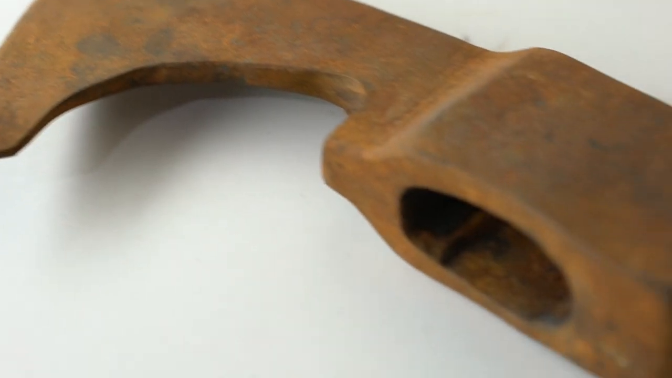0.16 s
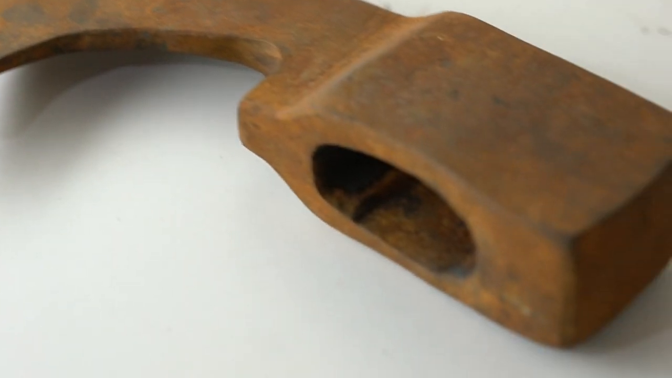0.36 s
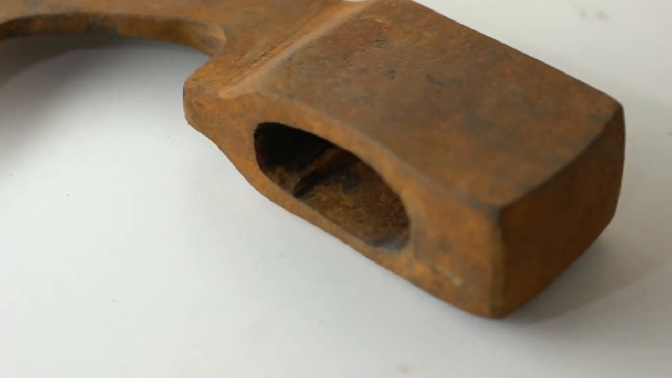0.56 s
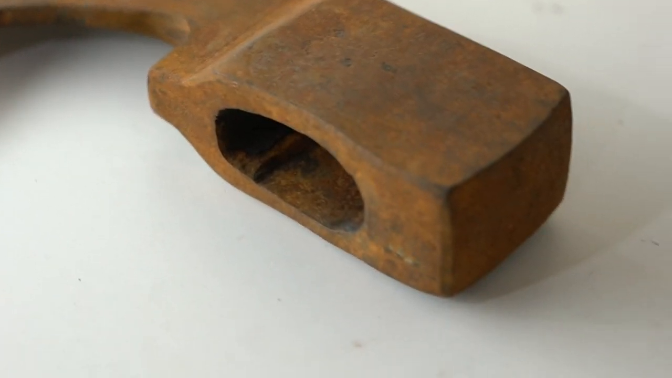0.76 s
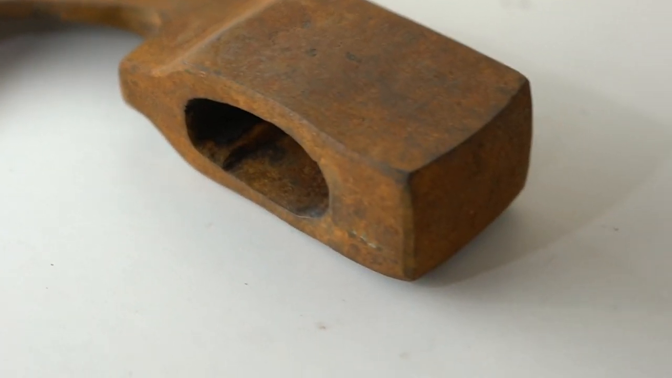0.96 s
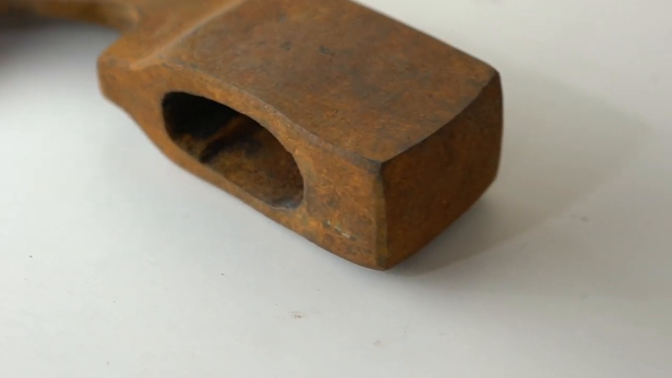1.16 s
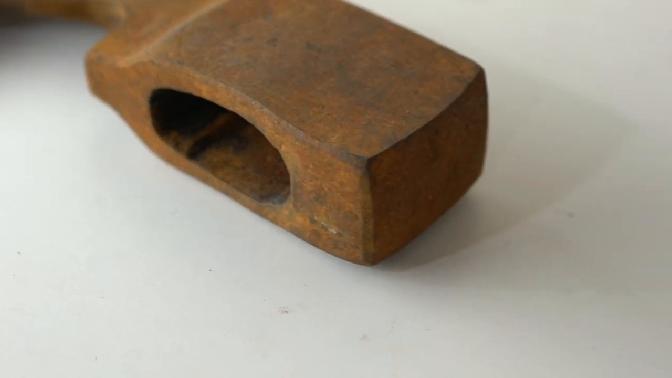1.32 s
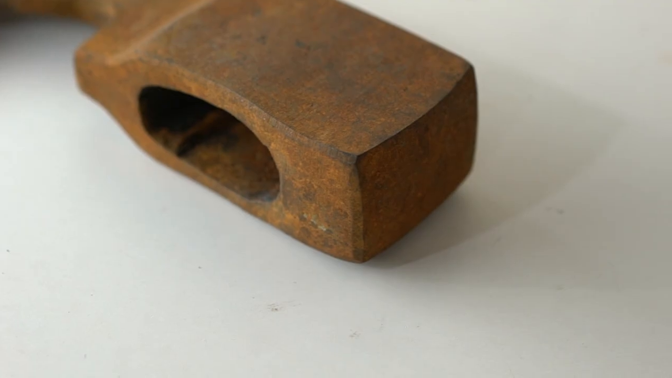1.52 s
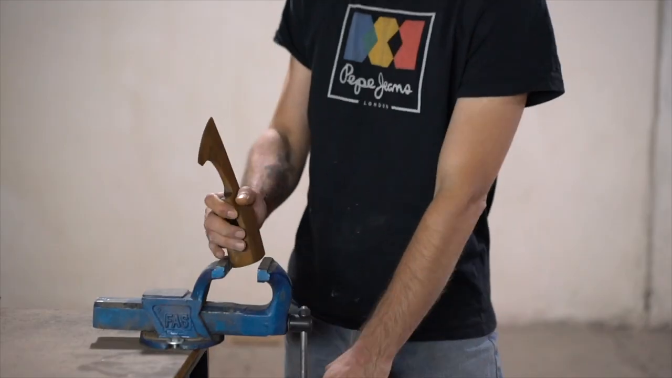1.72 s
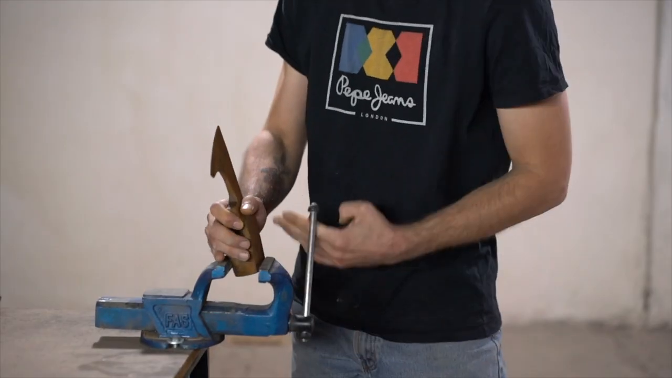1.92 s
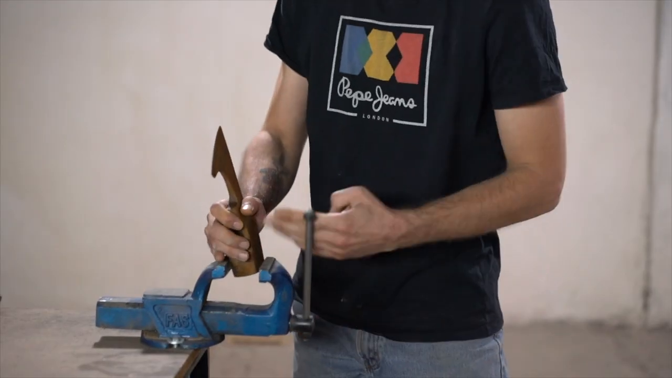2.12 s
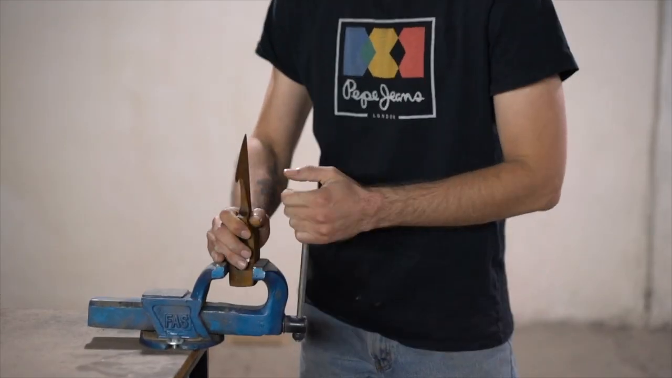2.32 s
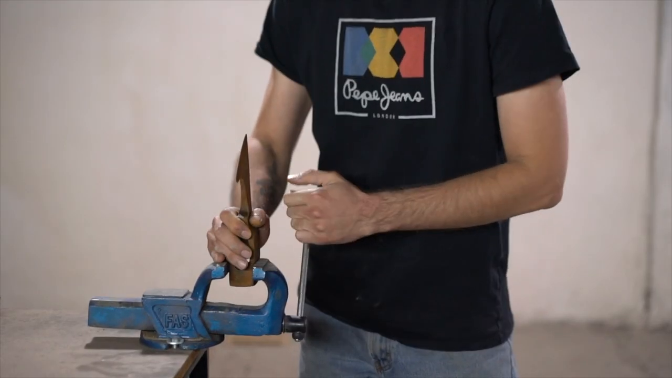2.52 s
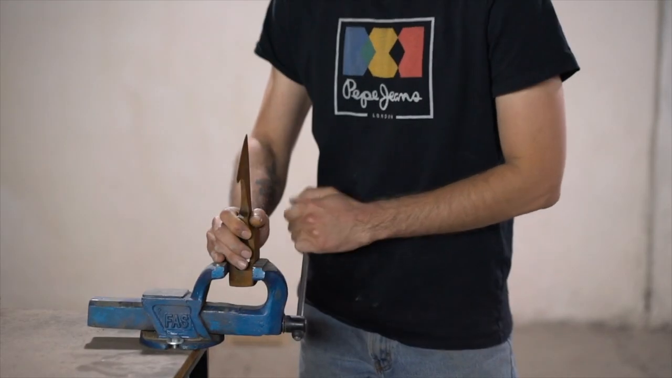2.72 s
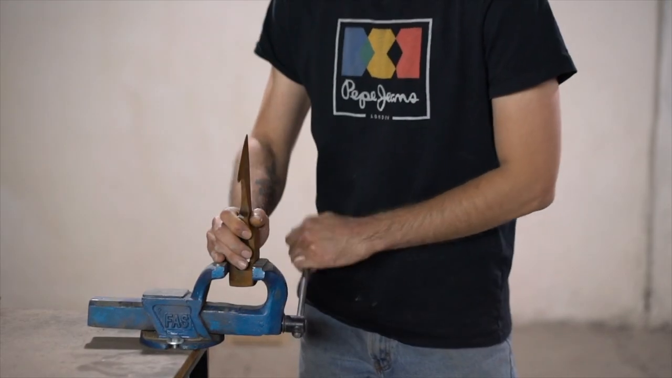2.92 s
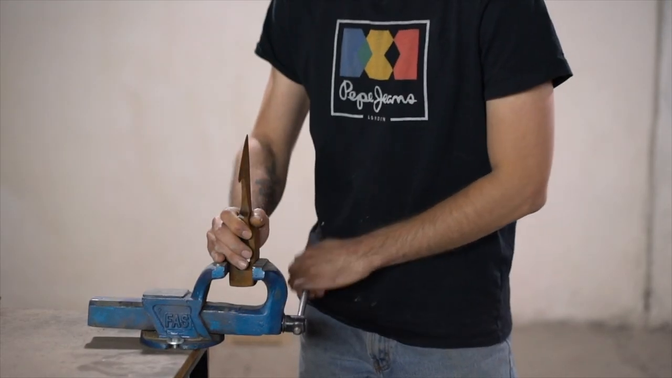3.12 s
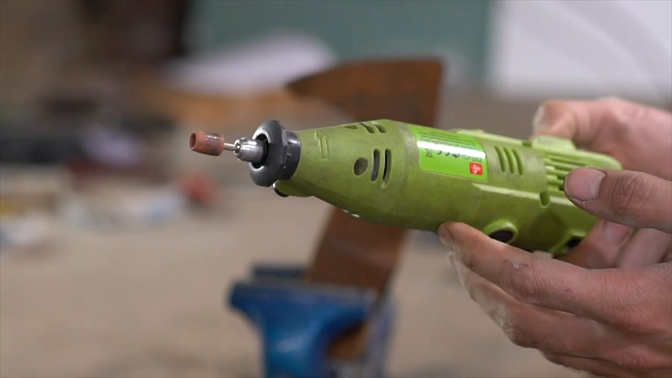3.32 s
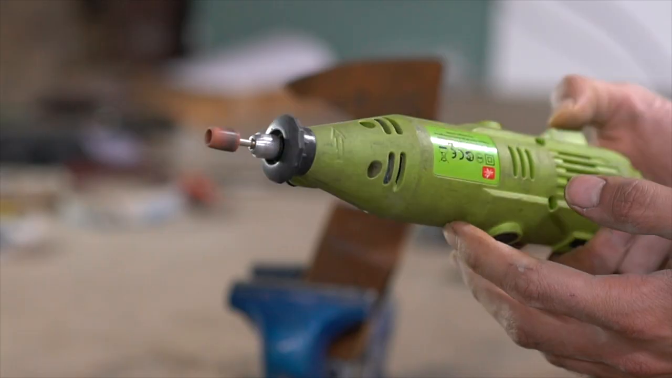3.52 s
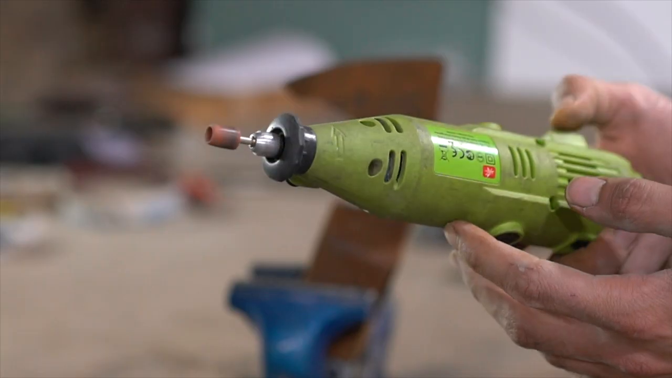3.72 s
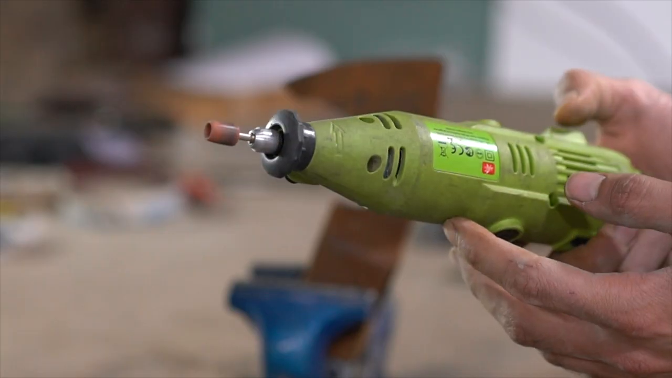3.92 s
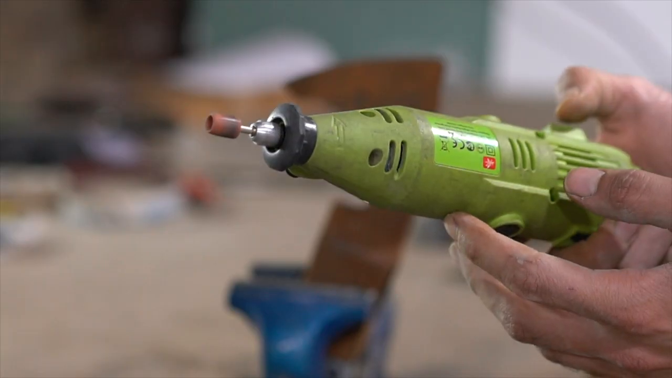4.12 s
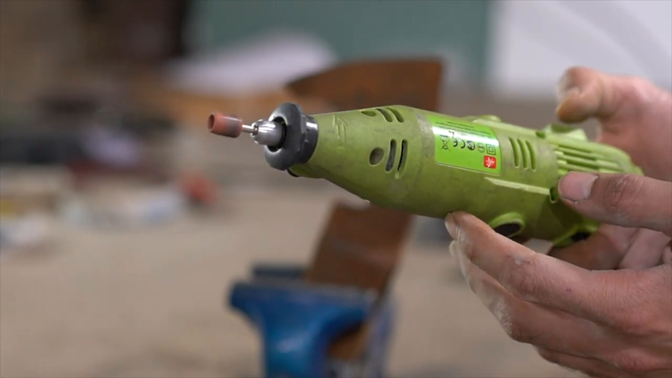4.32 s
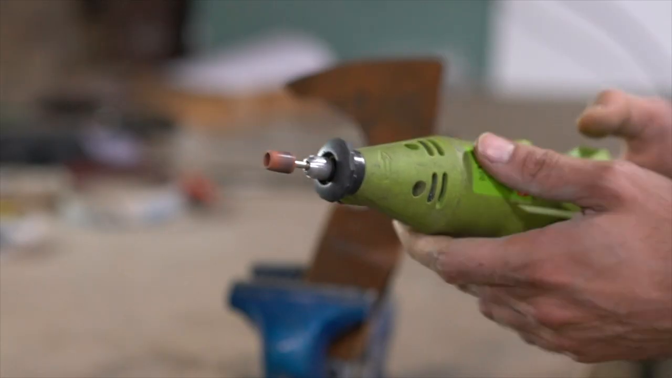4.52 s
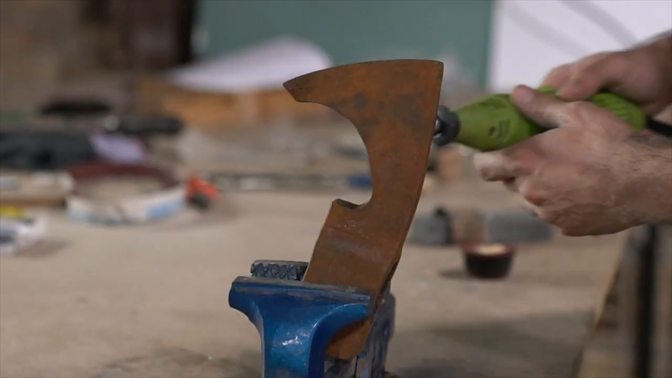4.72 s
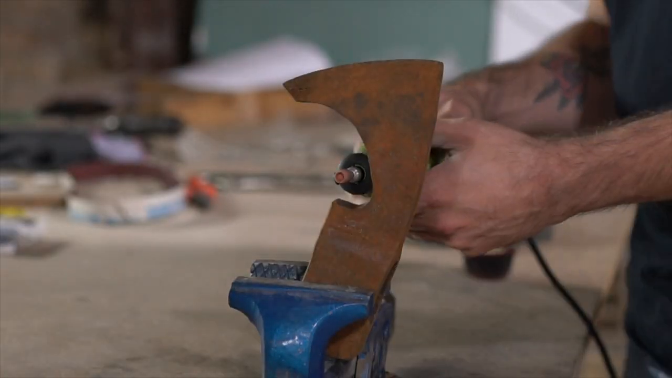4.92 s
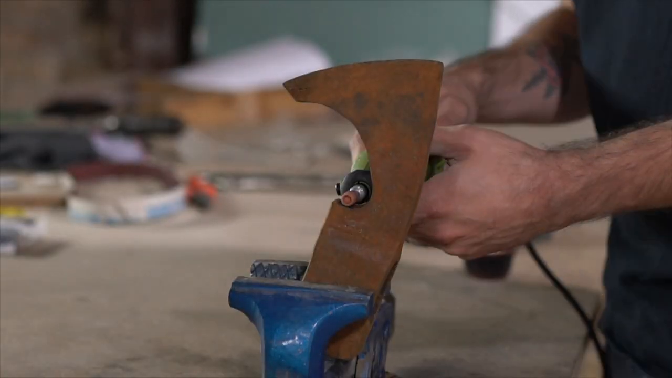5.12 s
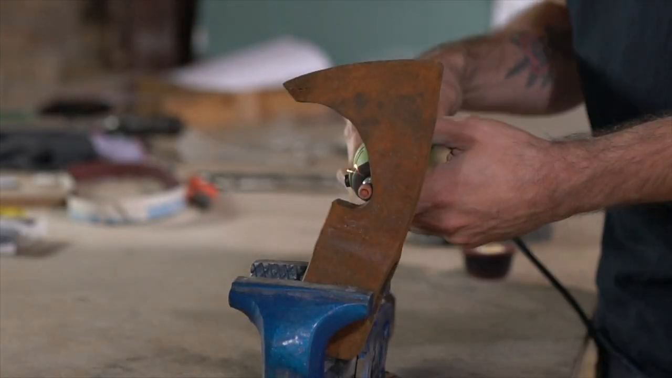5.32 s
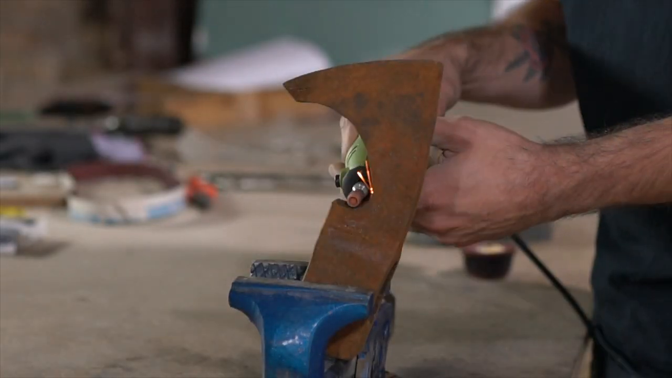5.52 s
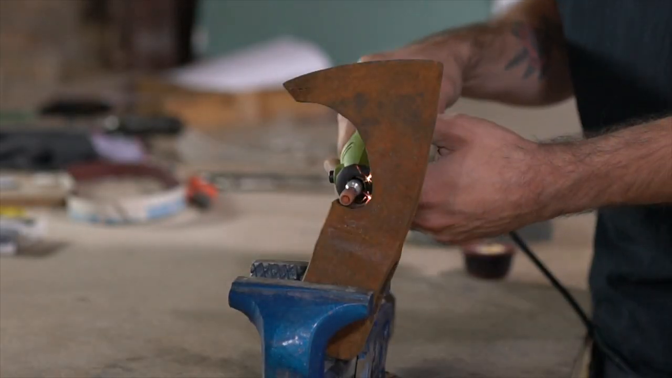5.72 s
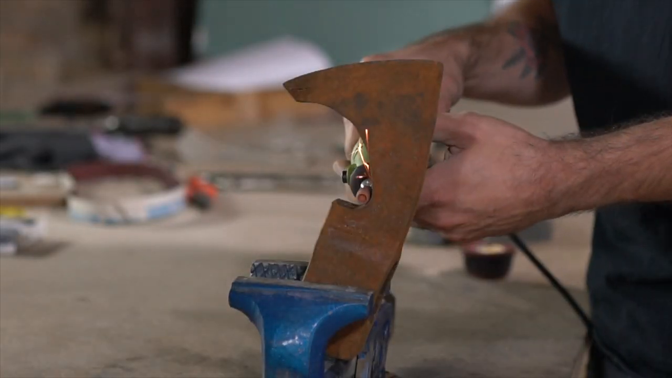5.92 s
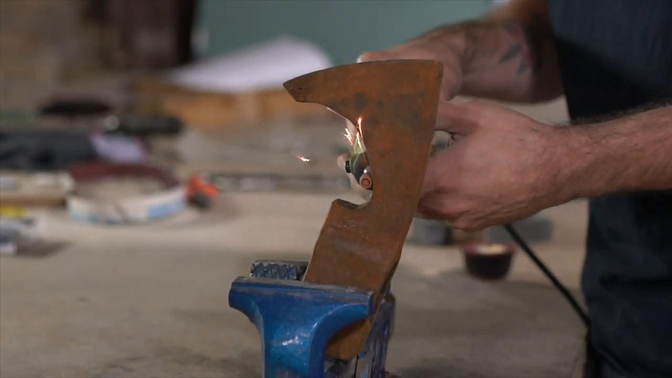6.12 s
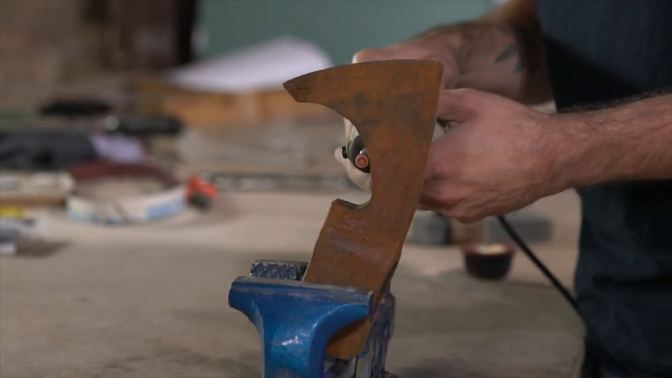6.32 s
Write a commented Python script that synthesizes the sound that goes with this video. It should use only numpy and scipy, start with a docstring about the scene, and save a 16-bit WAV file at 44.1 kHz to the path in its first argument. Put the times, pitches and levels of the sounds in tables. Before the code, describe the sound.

From 0 to 1.6 s there is only quiet, lumpy low rumble, distant traffic-like noise, faint hiss and slightly wavering low hums. At about 1.65 s a wash of noise bursts in and fades; at 1.75 s a hard metal clank strikes the vise, with a weaker knock just after and another at 2.1 s. A bright metallic handle ping sounds at 2.43 s, then a dull knock at 2.7 s, all echoing in the room, left-leaning. The background falls away near 3.2 s. At 3.4 s a small rotary tool clicks on close up, growls briefly and sweeps rapidly up into a shrill, buzzing whine with rushing air. It dips momentarily at 4.35 s and recedes at 4.5 s to a thinner steady whine. From 5.1 s the stone touches steel: gritty rasping, chatter and changing singing tones, the pitch sagging under growing pressure until 6.35 s.

```python
"""Distant rumble and hiss come first, shaped noise that lies under the whole scene, with low wavering sines. An
axe head is set into a bench vise in an echoing workshop and the handle is turned: blows excite decaying modes.
Washes of noise start abruptly and fade. A small rotary tool then clicks on and spins up: its whine is a set of
sines locked to the shaft, amid rushing air and shell buzz. Last its stone grinds the steel with noisy grit."""
import sys
import numpy as np
from scipy import signal
from scipy.io import wavfile
from scipy.ndimage import uniform_filter1d

SR = 44100
rng = np.random.default_rng(int(sys.argv[2]) if len(sys.argv) > 2 else 0)


def master(y):
    """Save y as 16-bit WAV."""
    cut = np.clip(np.atleast_2d(y).T, -1, 1)
    pcm = np.round(cut * 32767)  # scale
    wavfile.write(sys.argv[1], SR, pcm.astype(np.int16))


N = 280476
FRAME, HOP = 1024, 256  # short-time spectrum of the noises [samples]
STEP = 16  # spacing of the values that shape the whine [samples]
EDGE_HZ = 16000  # upper band limit
KICK_S, ON_S = 3.379, 3.388  # the shaft starts to climb; the tool becomes audible
TOP_HZ = 547  # top shaft speed [turns/s]

# likeness of left and right channels: (frequency [Hz], share of common signal [0-1])
SAME = [(140, 1.), (300, 0.96), (600, 0.68), (1500, 0.62), (5000, 0.34), (12000, 0.59)]
# the stone on the steel: (time [s], strike level [dB], grit level [dB])
CONTACT = [(5.11, -48.5, -25), (5.21, -39.5, -26), (5.3, -44.5, -30.5), (5.49, -39, -27.5),
           (5.57, -39, -25), (5.8, -39.5, -27), (6.1, -37.5, -27), (6.21, -42.5, -31.5),
           (6.36, -42.5, -38.5)]
# Tool levels in fours: (idle at the work [dB], added when near, by starting strain, by full pressure [dB])


def gain_of(db):
    """Amplitude ratio from a level: 20 dB is a factor of ten."""
    return 10 ** (np.asarray(db) / 20)


def evened(x):
    """Normalisation to unit effective (rms) value."""
    return x / np.sqrt(np.mean(x ** 2) + 1e-20)


def read(points, hz):
    """A spectral curve, interpolated over logarithmic frequency as pitch is."""
    f, value = np.transpose(points)
    return np.interp(np.log(hz + 1), np.log(f + 1), value, left=value[0], right=value[-1])


def columns(rows):
    """Linear interpolation in time: each column of a curve table, one value a sample."""
    s, *rest = np.transpose(rows)
    return [np.interp(np.arange(N) / SR, s, c) for c in rest]


def add(mix, s, sound):
    """Superposition: sound joins the mix in place from time s."""
    part = mix[..., round(s * SR):][..., :sound.shape[-1]]
    part += sound[..., :part.shape[-1]]


def wander(per_s, count=1, size=N, step=1):
    """Slow random modulation of rms near 1: random points joined by lines, a value every step samples."""
    points = rng.standard_normal((count, int(size / SR * per_s) + 2))
    at = np.arange(0, size, step) / SR * per_s
    joined = np.array([np.interp(at, np.arange(len(p)), p) for p in points])
    return joined * np.sqrt(1.5)  # lines between points lose a third of the power


def noise(shape_db, patchy_db, size=N):
    """Coloured stereo noise of rms 1 in the last size samples: a random spectrum weighted by shape_db(hz)."""
    frames, hz = size // HOP + 5, np.fft.rfftfreq(FRAME, 1 / SR)[:, None]
    a, b, c, d, patches = rng.standard_normal((frames, len(hz), 5)).T
    patches = uniform_filter1d(patches, size=12, axis=0)
    patches = evened(uniform_filter1d(patches, size=10, axis=1))
    same = np.clip(read(SAME, hz), 0, 1)
    left = a + 1j * b
    right = same * left + np.sqrt(1 - same ** 2) * (c + 1j * d)
    colour = gain_of(shape_db(hz))  # may vary from frame to frame
    colour = colour / np.linalg.norm(colour, axis=0) * gain_of(patchy_db * patches)
    sound = signal.istft(colour * np.array([left, right]), nperseg=FRAME, noverlap=FRAME - HOP)[1]
    return np.pad(evened(sound[:, :size]), [(0, 0), (N - size, 0)])


def steep(points):
    """Band limitation: a spectrum curve that drops by 60 dB outside its ends."""
    return lambda hz: read(points, hz) - 60 * ((hz < points[0][0]) | (hz > points[-1][0]))


def by_frame(curve, size):
    """Sampling of a curve at the frame rate, over its last size samples."""
    return np.pad(curve[-size::HOP], (0, 5), "edge")[:size // HOP + 5]


def room(x):
    """Reverberation: sparse reflections of random sign, each band decaying at its own rate."""
    # reverberation of the shop: (frequency [Hz], time to fall 60 dB [s])
    shop_decay = [(200, 4.14), (530, 0.75), (1400, 0.92), (3700, 0.28), (9700, 0.69)]
    taps = np.zeros((2, 2 * SR))
    at = np.arange(400, 2 * SR - 20, 20) + rng.integers(0, 20, (2, (2 * SR - 401) // 20))
    np.put_along_axis(taps, at, rng.choice([-1., 1.], at.shape), 1)
    hz, t, z = signal.stft(taps, SR, nperseg=512)
    same = np.clip(read(SAME, hz), 0, 1)[:, None]
    z[1] = same * z[0] + np.sqrt(1 - same ** 2) * z[1]
    fade = gain_of(-60 * t / read(shop_decay, hz)[:, None])
    tail = signal.istft(z * fade, SR, nperseg=512)[1]
    return signal.fftconvolve(x[None], tail / np.linalg.norm(tail[0]), axes=1)[:, :N]


def ring(modes):
    """Free vibration after a blow: exponentially decaying sines, scaled to peak 1."""
    t = np.arange(SR // 2) / SR
    # loose parts make each tone flutter, growing to full depth over the first 12 ms
    flutter_db = 6.5 * wander(240, count=len(modes), size=len(t)) * np.minimum(t / .012, 1)
    x = np.zeros(len(t))
    for flutter, (hz, db, t60) in zip(gain_of(flutter_db), modes):
        x += flutter * gain_of(db - 60 * t / t60) * np.sin(2 * np.pi * hz * t)
    return x / abs(x).max()


def outside():
    """Broadband background: lumpy low rumble, far traffic and hiss, with a shared swell of level."""
    # swell of all outside noise: (time [s], swell [dB])
    swell_curve = [(0, 1.5), (.95, 1.5), (1.5, 2), (1.9, 7.5), (2.6, 1.5), (3.17, -3), (3.25, -5.5),
                   (6.36, -7.5)]
    # spectra of the three noises: (frequency [Hz], relative density [dB])
    rumble_shape = [(26, -20), (36, 0.5), (55, -3), (78, 12), (98, -13), (122, 4), (160, -41.5),
                    (200, -10.5), (300, -23.5)]
    traffic_shape = [(150, -6), (320, 3), (1100, -4.5), (2000, -10), (5000, -29)]
    hiss_shape = [(1500, -12), (5000, -3.5), (16300, -10)]
    # soft swells of the traffic: (centre [s], level [dB], half length to 1/e [s])
    gusts = [(1.14, -52, 0.16), (1.46, -48.5, 0.054), (2.555, -46.5, 0.45)]
    t, swell = np.arange(N) / SR, columns(swell_curve)[0]
    # level [dB] plus a share of the swell
    rumble = gain_of(-43.5 + 1.14 * swell)
    traffic = gain_of(-54.5 + 2.5 * swell)
    hiss = gain_of(-62 + swell)
    traffic = traffic + sum(gain_of(db) * np.exp(-((t - s) / half) ** 2) for s, db, half in gusts)
    out = rumble * noise(steep(rumble_shape), patchy_db=0.5)
    out += traffic * noise(steep(traffic_shape), patchy_db=2.5)
    return out + hiss * noise(steep(hiss_shape), patchy_db=2.5)


def hums():
    """Low tones with slow joint amplitude and frequency modulation, so that they waver a little."""
    # hums that come and go: (start [s], end [s], frequency [Hz], level [dB])
    hum_rows = [(0, 0.47, 126.4, -47), (0.798, 1.687, 83.4, -43.5), (1.8, 2.305, 189.4, -44),
                (2.198, 2.583, 70, -38.5), (2.722, 3.094, 107.1, -43), (2.996, 3.207, 72.2, -42.5),
                (4.721, 5.24, 67, -48.5)]
    out = np.zeros(N)
    for (start, end, hz, db), w in zip(hum_rows, wander(9.3, count=len(hum_rows))):
        w = w[round(start * SR):round(end * SR)]
        turn = 2 * np.pi * np.cumsum(hz + 1.7 * w) / SR
        fade = signal.windows.tukey(len(w), .3)
        add(out, start, np.sqrt(2) * gain_of(db + 2. * w) * np.sin(turn) * fade)
    return out


def washes():
    """Exponentially decaying noise with an abrupt onset, low-passed at a corner set for each wash."""
    # washes: (onset [s], level [dB], treble corner [Hz], time to fall 60 dB [s])
    wash_rows = [(1.639, -34, 9050, 0.74), (2.209, -39, 9300, 0.16), (2.678, -44.5, 1820, 4.5)]
    t, (starts, _, tops, _) = np.arange(N) / SR, np.transpose(wash_rows)
    frame_s = (np.arange(N // HOP + 5) + 1) * HOP / SR
    top_hz = tops[np.maximum(np.searchsorted(starts, frame_s) - 1, 0)]  # corner of the latest wash

    def shape_db(hz):
        treble_db = -10 * np.log10(1 + (hz / top_hz) ** 4)
        return treble_db - 4.35 * np.log2(hz / 500 + 1) - 30 * (hz < 200)

    level = sum(gain_of(db - 60 * np.maximum(t - s, 0) / t60) * (t >= s) for s, db, _, t60 in wash_rows)
    return noise(shape_db, patchy_db=4.5) * level


def vise():
    """Impact excitation: knocks ring the jaws or loose handle, with a dull crack, and the shop reverberates."""
    # knocks: (time [s], level [dB], share of handle ring [0-1], left over right [dB], top of crack [Hz])
    knocks = [(1.754, -10, 0, 6.5, 3000), (1.838, -17, 0, 2, 1200), (2.079, -21.5, 0, 8.5, 1200),
              (2.4348, -16.5, 1, 11, 3640), (2.45, -21, 0, 8, 800), (2.682, -24, 0, 3, 1100)]
    # modes of the jaws and of the handle: (frequency [Hz], relative level [dB], time to fall 60 dB [s])
    jaw_modes = [(350, -4, .12), (490, 3, .13), (1230, -6, .07), (1400, 0, .09), (2780, -6, .08),
                 (4650, 5, .035), (5700, -3, .025)]
    handle_modes = [(380, -6, .1), (2790, -1, .2), (2960, 1, .22), (3090, -1, .22), (4380, -4, .08),
                    (4460, -6, .3), (5865, -9, .13)]
    near, far, t = np.zeros((2, N)), np.zeros(N), np.arange(SR // 2) / SR
    jaws, handle = ring(jaw_modes), ring(handle_modes)
    for s, db, share, pan_db, top_hz in knocks:
        dull = signal.butter(4, [150, top_hz], "bandpass", fs=SR, output="sos")
        ping = signal.butter(4, [150, 2.2 * top_hz], "bandpass", fs=SR, output="sos")
        share = np.clip(share, 0, 1)
        crack = signal.sosfilt(dull, rng.standard_normal(len(t))) * np.exp(-t / 0.025)
        body = (1 - share) * signal.sosfilt(ping, jaws) + share * handle
        onset = 1 - np.exp(-t / (0.0013 - .0011 * share))  # the handle speaks faster
        blow = gain_of(db) * (body + (1.3 - .6 * share) * crack) * onset
        add(near, s, blow * gain_of([[pan_db / 2], [-pan_db / 2]]))
        add(far, s, blow)
    return near + gain_of(-1.5) * room(far)


def handling():
    """Motor dynamics: shaft speed [turns/s], and the controls of each level: 1, nearness, strain, pressure."""
    # the stone presses on the steel: (time [s], pressure [0-1])
    load = [(5.11, 0), (5.3, .265), (5.52, .44), (5.72, .46), (6.0, .63), (6.2, .83), (6.3, .97), (6.36, 1)]
    free_hz, sag_hz = 642, 50.5  # speed aimed at, and speed lost to full pressure [turns/s]
    quick_s, slow_s, quick_share = .157, 1.246, .52  # time constants of the two climbs
    t = np.arange(N) / SR
    since, pressure = np.maximum(t - KICK_S, 0), columns(load)[0]
    lag = quick_share * np.exp(-since / quick_s) + (1 - quick_share) * np.exp(-since / slow_s)
    free = free_hz * (1 - lag)
    speed = -2 * np.logaddexp(-free / 2, -TOP_HZ / 2) - sag_hz * pressure  # held softly at the top speed
    near = np.interp(t, (4.505, 4.58), (1, 0))  # the tool moves from near the microphone to the work
    strain = np.exp(-since / 0.24)  # the strain of starting dies away
    return np.maximum(speed, 0), np.array([1 + 0 * t, near, strain, pressure])


def switch_click():
    """Impulsive excitation of two short modes as the tool is switched on."""
    # modes of the switch: (frequency [Hz], relative level [dB], time to fall 60 dB [s])
    switch_modes = [(5470, -3, 0.0047), (8180, -11, 0.0096)]
    click = np.zeros(N)
    add(click, 3.3845, gain_of(-23.0) * ring(switch_modes))
    return click


def rushing_air(controls, size):
    """Broadband flow noise, with a spectral notch while the motor strains and a slight flutter of level."""
    # spectrum of the air: (frequency [Hz], relative density [dB])
    air_shape = [(300, -34), (900, -73), (2000, -15.5), (4000, -9), (6000, -6.5), (11000, -4.5),
                 (16200, -13.5)]
    hollow_hz, hollow_half_hz, hollow_db = 4070, 410, -15
    strain = by_frame(controls[2], size)

    def shape_db(hz):
        notch = np.exp(-((hz - hollow_hz) / hollow_half_hz) ** 2)
        return steep(air_shape)(hz) + hollow_db * np.sqrt(strain) * notch

    level_db = (-34.5, 7, 5.5, 8) @ controls + 1.4 * wander(36)[0]
    return gain_of(level_db) * noise(shape_db, patchy_db=2.2, size=size)


def shell_buzz(controls, size):
    """Resonant noise of the shell, which also rattles in a brief growl as the motor catches."""
    near_hz, far_hz = 1540, 2030  # centre of the buzz near the microphone and at the work
    centre = by_frame(far_hz + (near_hz - far_hz) * controls[1], size)

    def shape_db(hz):
        return -10 * np.log10(1 + ((hz - centre) / 450) ** 2) - 7.3 * (hz < 900)

    since = np.maximum(np.arange(N) / SR - ON_S, 0)
    growl = gain_of(-16) * np.exp(-since / 0.025)
    level = gain_of((-35, 3.5, -39, -5) @ controls) + growl
    return level * noise(shape_db, patchy_db=2.5, size=size)


def housing(hz):
    """Resonance: the gain in dB that the plastic shell gives a tone passing its modes."""
    # shell resonances: (frequency [Hz], width [Hz], gain [dB])
    shell = [(1300, 340, 11), (2400, 400, 21)]
    power = sum(gain_of(db) ** 2 / (1 + (2 * (hz - f) / width) ** 2) ** 2 for f, width, db in shell)
    return 10 * np.log10(1 + power)


def chance(per_s, count):
    """Random modulation over the running time of the tool, a value every STEP samples."""
    return wander(per_s, count=count, size=N - round(ON_S * SR), step=STEP)


def unbalance(speed, pressure):
    """Forced vibration once a turn, in dB: grows with speed, peaks at body resonance, is damped by the steel."""
    body_hz, body_width_hz, body_db = 544, 26, 8
    touch = np.clip((pressure - .2) / 0.25, 0, 1)
    peak_db = body_db / (1 + (2 * (speed - body_hz) / body_width_hz) ** 2)
    damped_db = touch * (11 + 3.9 * chance(21.28, count=1)[0])
    return -36 - 0.135 * (TOP_HZ - speed) + peak_db - damped_db


def shaft_lines(t, speed, controls):
    """Line spectrum of a rotating machine: pairs of (multiple of the shaft rate, level curve in dB)."""
    # motor tones: (multiple of shaft rate, idle [dB], added near [dB], by strain [dB], by pressure [dB])
    motor_tones = [(4.35, -66, 12, 0, 0), (8, -46, -2, 1, 5), (16, -56, 10, 16, 12), (18, -41, -2, -12, -4),
                   (22, -44, 0, -4, 2), (24, -55, 15, 0, 7)]
    # bearing whines: (multiple of shaft rate, level against the comb [dB])
    bearing_whines = [(2.6, -3), (10.4, -1), (14.25, 5), (17.7, 5), (20.45, 5)]
    # pattern of each turn, other multiples being faint: (multiple of shaft rate, level [dB])
    turn_pattern = [(2, -0.5), (3, -5.5), (4, -1.5), (6, -2), (12, -2.5), (13, 2), (17, 3.5)]
    # fine tones of the start: multiples of the shaft rate, then their levels
    bundle, bundle_db = (28.2, 30.8, 34.3, 35.4, 37.5), (-66, 11, 25, 0)
    strikes_db = columns(CONTACT)[0][round(ON_S * SR)::STEP]
    strike_db = np.where(t < CONTACT[0][0], -64.5, strikes_db)  # idle until the stone touches
    comb_db = (-55, 11, -6, 12) @ controls

    lines = [(1, unbalance(speed, controls[3]))]
    rows = motor_tones + [(k, *bundle_db) for k in bundle]
    for (k, *levels), w in zip(rows, chance(14, count=len(rows))):
        lines.append((k, levels @ controls + 3 * w))
    for (k, db), w in zip(bearing_whines, chance(10.0, count=len(bearing_whines))):
        lines.append((k, comb_db + db - 12 * controls[3] + 0.56 * w))
    # the stone strikes with the same face each turn
    pattern = {round(k): db for k, db in turn_pattern}
    for k, w in zip(range(2, 30), chance(9, count=28)):
        base_db = strike_db if k < 10 else comb_db
        lines.append((k, base_db + pattern.get(k, -6.) + 3.8 * w))
    return lines


def whine(speed, controls):
    """Additive synthesis locked to the shaft angle: every tone glides with the speed, shaped by the shell."""
    radiates_hz, radiates_db = 6000, 14  # fine tones carry poorly below this pitch, by dB an octave
    on = round(ON_S * SR)
    fine = np.arange(on, N) / SR
    unsteady = 1 + 0.00049 * wander(59.46, size=N - on)[0]
    angle = 2 * np.pi * np.cumsum(speed[on:] * unsteady) / SR
    t, speed, controls = fine[::STEP], speed[on::STEP], controls[:, on::STEP]
    lines = shaft_lines(t, speed, controls)
    rough = (.25, 0, 1.2, .55) @ controls  # depth of the fast flutter that blurs each tone
    catch_db = -60 * np.exp(-(t - ON_S) / .045)  # the finest tones grow out of the rattle of the start
    shaking = np.clip((420 - speed) / 60, 0, 1)  # the shell shakes most while the motor strains
    tones = np.zeros((2, N))
    draws = rng.random((len(lines), 2))
    for (k, db), (start, lag), fast in zip(lines, draws, chance(170, count=len(lines))):
        turn, hz = k * angle + 2 * np.pi * start, k * speed
        # reflections shift each tone between the microphones
        apart = np.cos(np.pi * lag) * min(0.16 + k / 4, 1.)
        weak_db = (k > 9) * radiates_db * np.log2(np.clip(hz / radiates_hz, .05, 1))
        size = gain_of(db + housing(hz) * shaking + weak_db + (k > 20) * catch_db)
        size = size * (hz < EDGE_HZ) * (1 + min(k / 4, 1) * rough * fast)
        tones[:, on:] += np.sqrt(2) * np.interp(fine, t, size) * np.sin([turn, turn + apart])
    return tones + singing(angle)


def singing(angle):
    """Amplitude-modulated tones locked to the shaft angle, which swell, waver and stop."""
    # tones that sing out for a while: (start [s], end [s], level [dB], multiples of the shaft rate ..)
    songs = [(3.48, 3.64, -37, 24.4, 34.5), (3.62, 3.81, -35, 16, 21.1, 24),
             (3.78, 3.97, -37, 15, 17, 17.7, 24), (4.02, 4.3, -35, 13, 17.7, 20.45, 24),
             (4.83, 5.16, -29, 18), (5.13, 5.7, -38, 8, 18), (5.53, 5.87, -31, 4), (5.5, 5.8, -36, 3, 5),
             (5.5, 5.9, -38, 9, 13), (5.84, 6.1, -35, 5.8, 8), (6.09, 6.2, -30, 8),
             (6.13, 6.4, -36, 13, 15, 17, 20), (6.2, 6.4, -35, 6, 7, 21, 25)]
    out, on = np.zeros((2, N)), N - len(angle)
    for start, end, db, *times in songs:
        part = angle[round(start * SR) - on:round(end * SR) - on]
        fade = signal.windows.tukey(len(part), .3)
        slow = wander(20, count=len(times), size=len(part))
        for k, w, (start_turn, lag) in zip(times, slow, rng.random((len(times), 2))):
            w = w + 1.3 * wander(110, size=len(part))[0]  # chatter roughens it
            turn = k * part + 2 * np.pi * start_turn
            swell = np.sqrt(2) * gain_of(db) * evened(gain_of(2.8 * w)) * fade
            add(out, start, swell * np.sin([turn, turn + np.cos(np.pi * lag)]))
    return out


def grit(touching, size):
    """Friction noise, coloured by what the ground steel and the stone sound with."""
    # spectrum of the grit: (frequency [Hz], relative density [dB])
    grit_shape = [(300, -16), (900, -10.5), (2050, -0.5), (2500, 1), (3000, 4), (3600, -12), (4150, 1),
                  (5300, -8.5), (6800, 1.5), (9000, -8), (16200, -15)]
    level = gain_of(columns(CONTACT)[1]) * touching
    return level * noise(steep(grit_shape), patchy_db=3.0, size=size)


def tool():
    """Superposition of whine, air, buzz and grit under one envelope, chattering as the stone bounces."""
    # brief dips of the tool's level: (time [s], depth [dB])
    skips = [(3.855, 3.5), (3.914, 4.5), (3.966, 4.5), (4.016, 6), (5.301, 3.5), (5.51, 7.5), (5.584, 4),
             (5.657, 5), (5.702, 4)]
    t, (speed, controls) = np.arange(N) / SR, handling()
    size = N - round(KICK_S * SR)
    touching = np.clip((t - 5.05) / 0.34, 0, 1)
    sound = whine(speed, controls) + rushing_air(controls, size)
    sound += shell_buzz(controls, size) + grit(touching, size)
    dip = 1 - 0.74 * np.exp(-((t - 4.338) / 0.022) ** 2)  # the level dips briefly
    skips_db = sum(db * np.exp(-((t - s) / 0.0067) ** 2) for s, db in skips)
    bounce_db = 0.61 * touching * wander(36)[0]
    running = np.clip((t - ON_S) / 0.093, 0, 1) * dip * gain_of(bounce_db - skips_db)
    direct = sound * running + switch_click()
    return direct * gain_of([[-1.7], [1.5]]) + gain_of(-11.5) * room(direct.mean(0))


def scene():
    """Linear superposition of the background, the vise and the tool."""
    return outside() + hums() + washes() + vise() + tool()


def record(dry):
    """Low-pass filtering: the band limit of the recorder."""
    lowpass = signal.firwin(511, EDGE_HZ, window=("kaiser", 9), fs=SR)
    return signal.oaconvolve(dry, lowpass[None], "same")


dry = scene()
out = record(dry)
master(out)
```